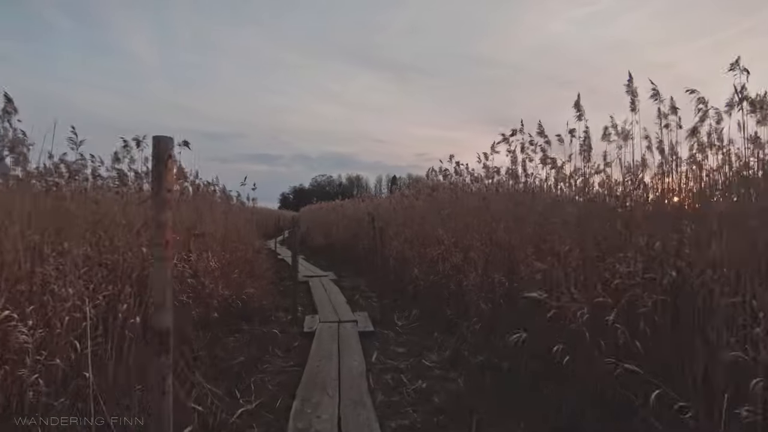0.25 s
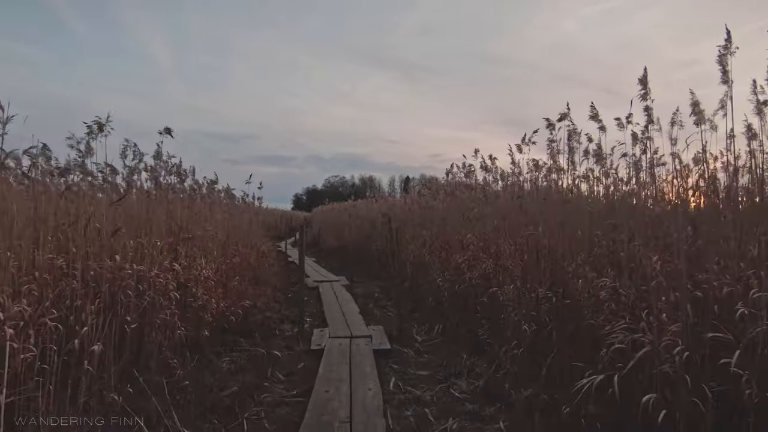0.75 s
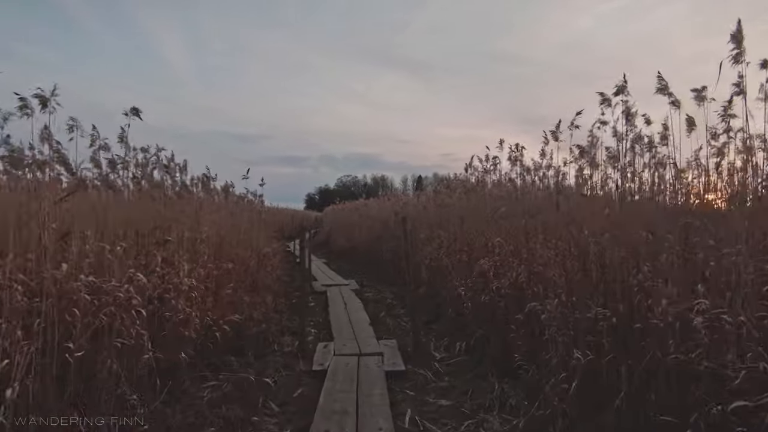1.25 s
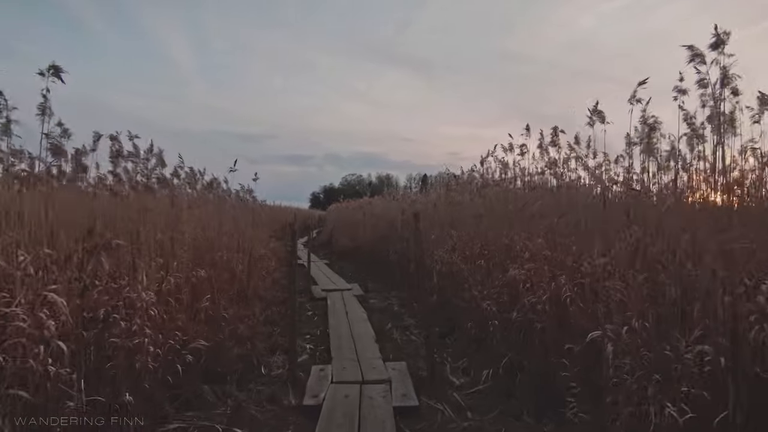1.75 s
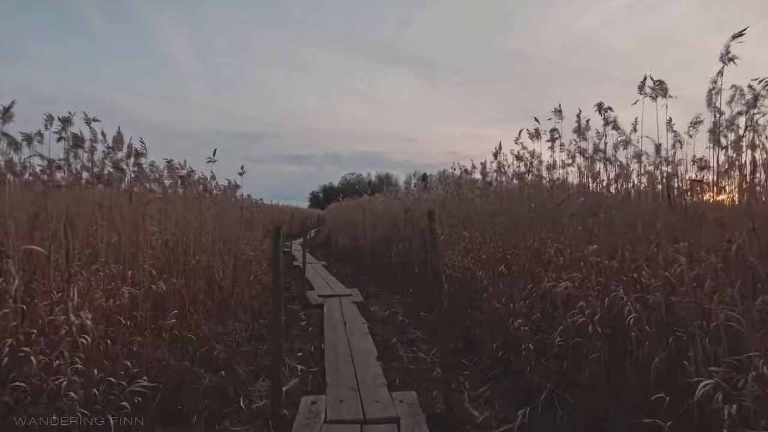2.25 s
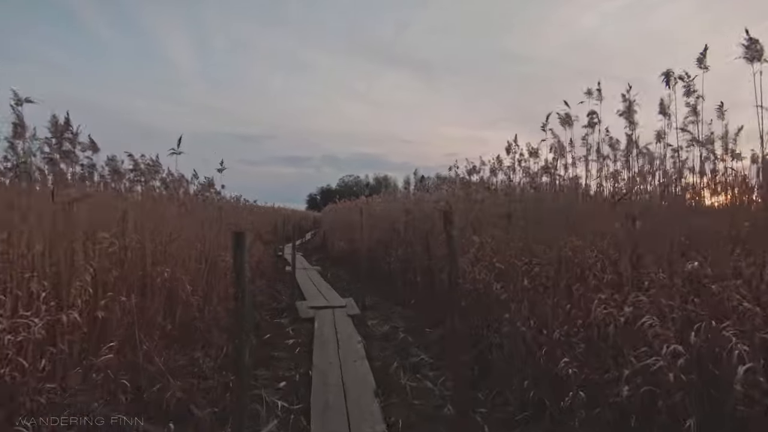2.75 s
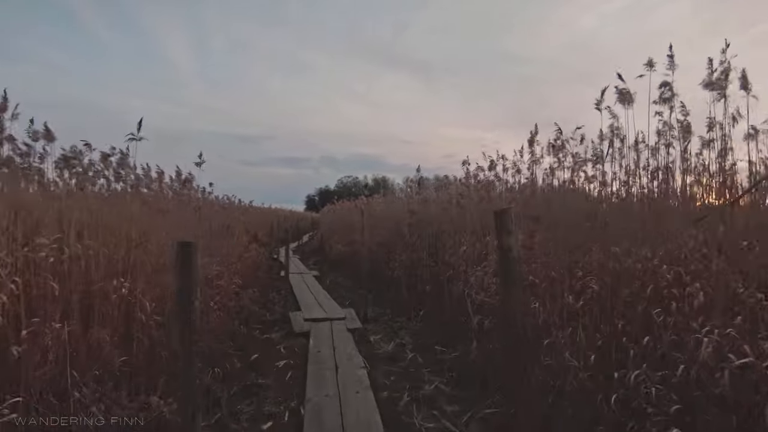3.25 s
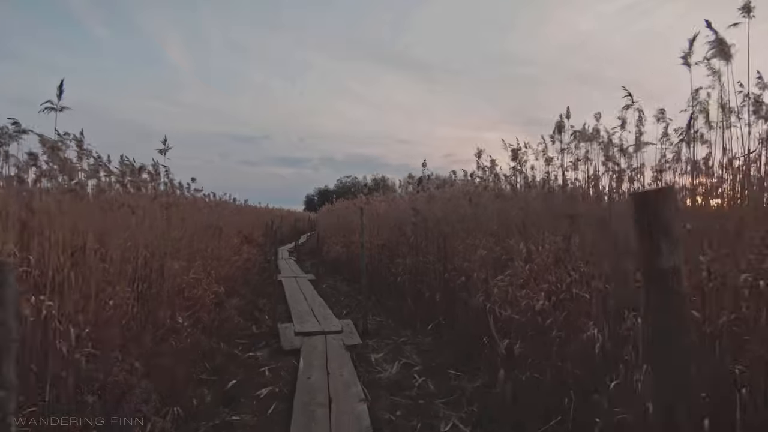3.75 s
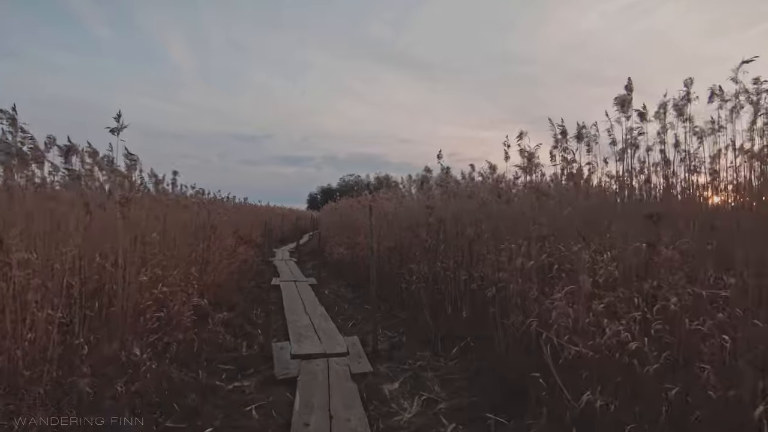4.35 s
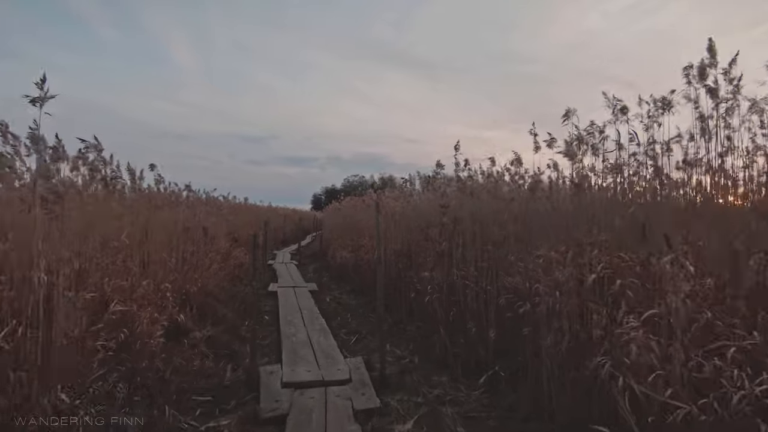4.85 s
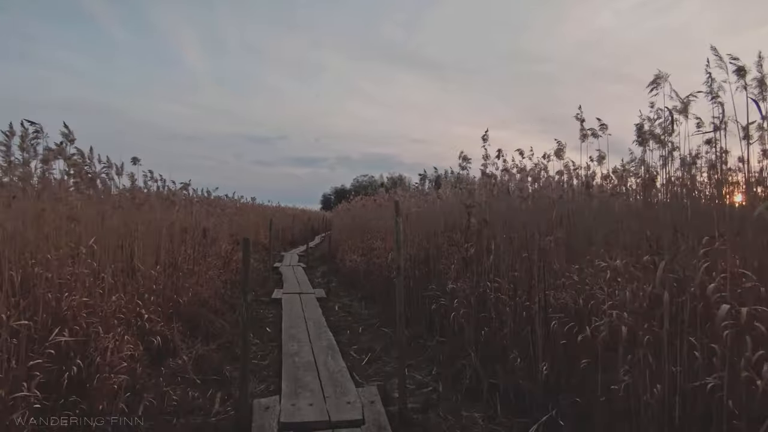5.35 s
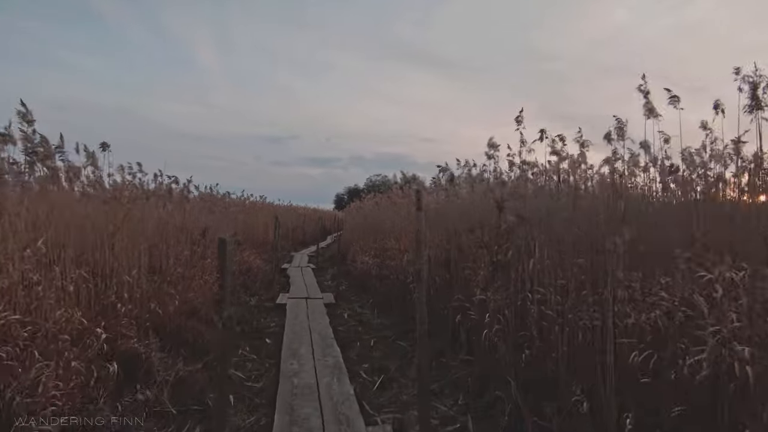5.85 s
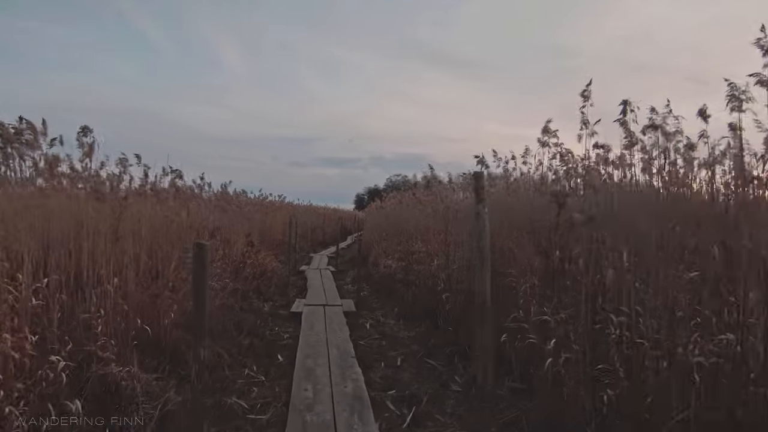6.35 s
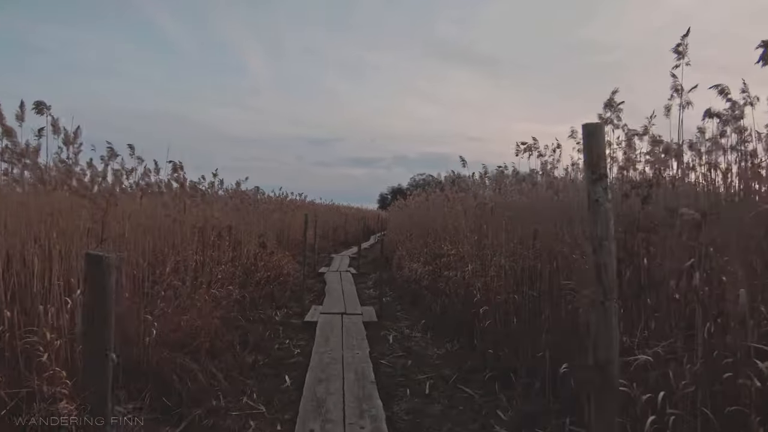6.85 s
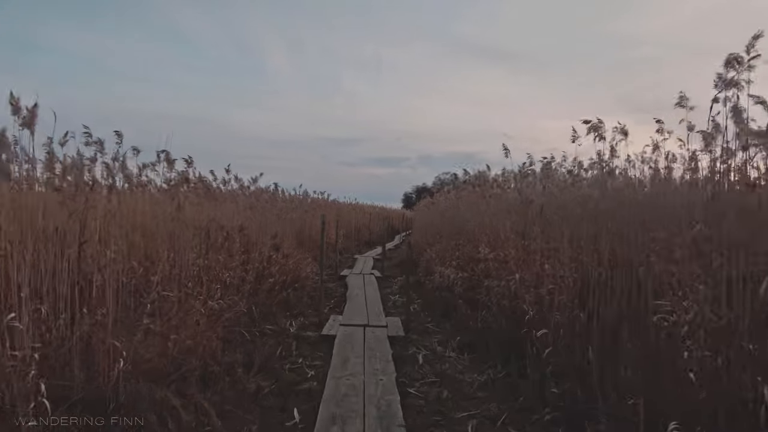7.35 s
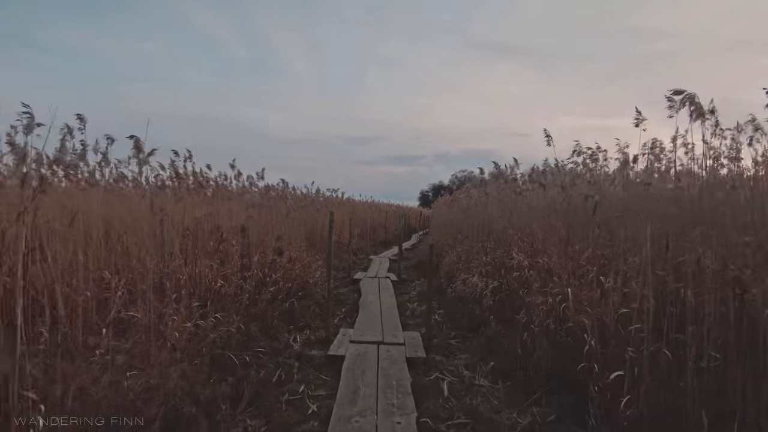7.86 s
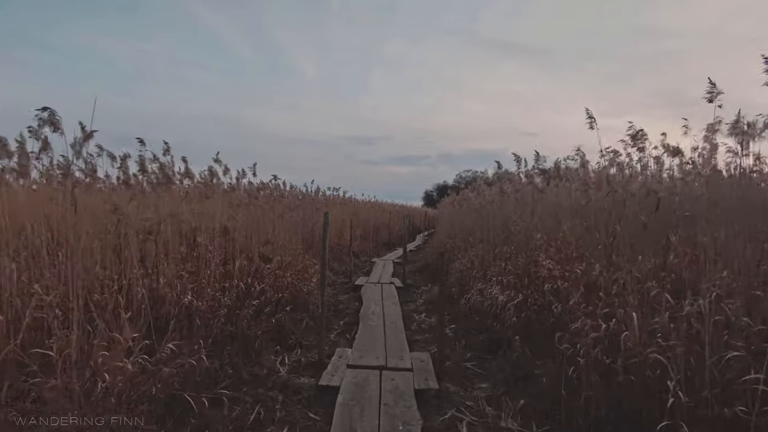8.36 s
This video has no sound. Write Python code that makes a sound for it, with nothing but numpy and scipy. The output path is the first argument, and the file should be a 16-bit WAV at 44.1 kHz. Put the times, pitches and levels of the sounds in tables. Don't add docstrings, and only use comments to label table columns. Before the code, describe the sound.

Close outdoor walking sounds from a small microphone carried by the walker: about two steps a second, hollow plank thuds with a quick chirpy attack, some doubled as the weight settles. Grit cracks and dry stems snap irregularly around them, soles brush and drag, and faint rubber squeaks mark mid stride. Low wind buffeting rises and falls beneath, strongest near the end, with a faint, smooth rush of reeds behind.

```python
import sys
import numpy as np
from scipy import signal
from scipy.fft import rfft, irfft, next_fast_len
from scipy.io import wavfile
from scipy.ndimage import uniform_filter1d

SR = 44100
rng = np.random.default_rng(int(sys.argv[2]) if len(sys.argv) > 2 else 0)


def invert_db(x):
    u = np.asarray(x, float) / 20
    return 10 ** u


def wav_out(sig):
    wavfile.write(sys.argv[1], SR, np.round(np.clip(np.atleast_2d(sig).T, -1, 1) * 32767).astype(np.int16))


N = 380141

# (time [s], buffeting level [dB])
WIND = [(0.0, -28.5), (0.5, -39), (1.0, -33.5), (1.5, -30), (1.85, -29), (2.3, -30.5), (2.75, -31.5),
        (3.3, -33), (3.75, -32.5), (4.2, -31), (4.75, -30), (5.3, -29), (5.75, -26), (6.3, -32), (7.0, -19),
        (7.7, -34), (8.3, -22.5), (8.62, -33.5)]
# (frequency [Hz], level [dB per Hz])
BUFFET_SPECTRUM = [(1.2, 8), (3, 18.5), (8, 4), (15, -1.5), (22, 3), (30, -32.5)]
RUMBLE_SPECTRUM = [(22, -6.5), (35, -6), (55, -15.5), (90, -27), (150, -29)]
RUSTLE_SPECTRUM = [(60, -1), (150, -12.5), (300, -5), (600, -15), (1100, -26), (2500, -37.5)]
RUSH_SPECTRUM = [(500, 4.5), (1200, -2.5), (2500, -4), (5000, -9), (8000, -8.5), (11000, -12.5),
                 (16000, -11.5)]
# (time [s], peak [dB], plank mode [Hz], hollow mode [Hz], hollow over plank [dB])
HEELS = [(0.6447, -37, 349, 178, -24), (0.659, -35.5, 260, 247, -8), (0.712, -37, 515, 240, -13),
         (1.213, -37, 414, 201, -6), (1.718, -48, 493, 256, 3), (2.294, -33.5, 298, 250, -7),
         (2.861, -36.5, 386, 216, -1.5), (3.395, -37, 354, 212, -10), (3.945, -62, 356, 192, 20.5),
         (3.985, -38, 284, 255, -22), (3.99, -26, 347, 262, -18), (4.56, -25, 325, 266, -13),
         (5.056, -36, 323, 188, -0.5), (5.594, -36.5, 367, 220, -11.5), (6.166, -38, 461, 217, -0.5),
         (6.71, -38, 348, 200, -1), (7.273, -45.5, 265, 236, -4), (7.82, -31.5, 349, 262, -11.5),
         (8.367, -31.5, 293, 180, -6.5)]
SETTLES = [(0.072, -31, 316, 202, -16), (1.221, -28, 284, 260, -28), (1.753, -32, 339, 182, -2.5),
           (3.432, -52, 290, 219, 20), (4.482, -39.5, 300, 198, -1), (4.571, -29, 285, 257, -2.5),
           (4.623, -40.5, 336, 237, -9), (5.064, -51.5, 254, 226, 18), (7.299, -47, 306, 183, 12.5),
           (7.834, -34, 310, 223, -1.5), (8.386, -41.5, 342, 218, 9.5)]
# (frequency [Hz], level over bending wave [dB], t60 [s])
PLANK_UPPER_MODES = [(487, -14.5, 0.044), (720, -12.5, 0.023), (970, -16.5, 0.011), (1500, -13, 0.014),
                     (1840, -6, 0.0042)]
# (start [s], length [s], level [dB], sole ring [Hz])
BRUSHES = [(0.105, 0.056, -62, 3360), (0.663, 0.047, -54.5, 1500), (1.239, 0.032, -61, 2500),
           (1.759, 0.058, -62.5, 3500), (2.322, 0.05, -51, 1300), (3.962, 0.029, -47.5, 2000),
           (4.501, 0.062, -58, 1640), (5.619, 0.071, -58, 2190), (6.191, 0.069, -53, 1460),
           (6.957, 0.052, -65, 2090), (7.205, 0.036, -62.5, 3000), (7.269, 0.1, -56, 1570),
           (7.383, 0.068, -56, 1870), (7.75, 0.067, -56.5, 2220), (7.816, 0.045, -59.5, 3240),
           (8.384, 0.065, -56, 2010)]
DRAGS = [(2.368, 0.046, -49.5, 1200), (2.529, 0.057, -62, 1460), (2.895, 0.051, -54.5, 2740),
         (3.429, 0.032, -57.5, 2430), (3.98, 0.105, -50.5, 1210), (4.025, 0.055, -55.5, 2420),
         (4.383, 0.074, -63.5, 2840), (5.232, 0.09, -63, 1710), (5.92, 0.03, -55.5, 800),
         (6.727, 0.053, -47.5, 1750), (7.442, 0.022, -51, 2400), (2.432, 0.061, -62, 1240),
         (7.918, 0.033, -59, 1730), (4.251, 0.04, -57.5, 1200), (5.86, 0.05, -65, 1400)]
# (time [s], squeak peak [dB], pitch [Hz], scuff level [dB])
PEELS = [(0.4244, -54, 3770, -57.5), (0.9644, -63.5, 3010, -64), (1.545, -62.5, 2720, -65),
         (2.061, -62, 2580, -62), (2.637, -64, 3750, -63.5), (3.171, -63.5, 3350, -68),
         (3.738, -53, 4080, -58), (4.272, -59.5, 3560, -64), (5.937, -57, 4100, -64),
         (6.482, -70, 2540, -66), (7.053, -59, 3150, -57), (8.151, -56.5, 3640, -60),
         (8.534, -61, 3500, -65)]
# (time [s], peak [dB], ring [Hz], treble over ring [dB])
STALKS = [(0.1471, -41, 1300, 13.5), (0.2016, -51.5, 1240, 19), (0.6595, -23.5, 1880, 6),
          (0.7128, -10, 2110, 7), (0.8054, -52, 1240, 16), (1.2774, -30.5, 1640, 3.5),
          (1.3075, -42, 2350, 9), (1.6553, -42.5, 1500, 5), (2.3351, -39, 1210, -6),
          (2.349, -39.5, 1390, 8.5), (2.377, -41.5, 1240, 9), (2.4274, -34.5, 1260, 6),
          (2.4545, -37.5, 1450, -7), (2.8644, -32.5, 1420, 7), (3.4187, -45, 1407, -11),
          (5.0897, -41.5, 1470, -1), (5.117, -28.5, 1640, 7), (5.8713, -53, 1370, 19),
          (6.1966, -38, 1220, -6), (7.258, -39, 1340, 2), (7.2952, -41.5, 1640, 18.5),
          (7.3477, -45.5, 1590, 18), (7.416, -51, 1200, 0), (7.451, -42, 1270, -8),
          (7.7569, -39.5, 1970, 13.5), (8.422, -63, 1410, -9.5), (8.515, -52, 3600, -8.5)]
# (time [s], peak [dB], ring [Hz], debris tail [dB])
GRIT = [(0.167, -35, 2140, -14), (1.51, -44.5, 1460, -7.5), (1.717, -32.5, 1450, -7.5),
        (1.7518, -37, 1700, -15), (1.8595, -46.5, 1470, -1), (2.9125, -41, 2880, -1.5),
        (3.0134, -50, 1200, 0), (3.45, -45, 1430, -9), (3.9823, -26.5, 1310, -5.5),
        (4.4854, -39, 1610, -19), (4.5615, -21.5, 1650, -13), (4.5948, -39.5, 1650, -5),
        (4.765, -44, 1710, -13), (6.7513, -20.5, 1770, -23), (7.317, -36.5, 1320, -1),
        (7.503, -27, 1400, -6.5), (7.979, -42.5, 1810, -6), (8.547, -43.5, 2070, -7)]

RUMBLE_DB, RUSTLE_DB, RUSH_DB = -60, -61, -67.5
RUMBLE_FOLLOWS_WIND = 0.4
RUSTLE_RISE_DB_PER_S = 0.35
PLANK_T60_S, CAVITY_T60_S = 0.081, 0.12
HEEL_WAVE_DB, SETTLE_WAVE_DB = -40.5, -48
WAVE_FOLLOWS_BLOW = 0.46
BRUSH_TREBLE_DB, DRAG_TREBLE_DB, PEEL_TREBLE_DB = -1.5, -19, -24
BRUSH_RING_DB, DRAG_RING_DB, PEEL_RING_DB = -15, -9.5, -14
RING_DB_PER_OCTAVE = 9
PEEL_LEAD_S, PEEL_S = 0.02, 0.045
PEEL_RING_SHARE = 0.65
STALK_TAIL_DB, STALK_T60_S = -9, 0.083
BIG_SNAP_T60_LOSS_S = 0.0016
GRIT_TREBLE_DB, GRIT_T60_S = -38, 0.071
SQUEAK_S = 0.009
GROUND_ECHO_S, GROUND_ECHO_DB = 0.003425, -18.5
MICROPHONE_TOP_HZ = 15900


def rms_one(x):
    return x / np.sqrt(np.mean(x ** 2) + 1e-20)


def add(out, s, sound):
    i = max(round(s * SR), 0)
    out[i:i + len(sound)] += sound[:N - i]


def in_time(rows):
    s, *columns = np.transpose(rows)
    return [np.interp(np.arange(N) / SR, s, c) for c in columns]


def drift(rate):
    r = np.exp(-80 * np.pi * rate / SR)
    noise = rng.standard_normal(N // 40 + 2002)
    slow = signal.lfilter([1], [1, -2 * r, r * r], noise)[2000:]
    return np.interp(np.arange(N) / 40, np.arange(len(slow)), rms_one(slow))


def coloured(spectrum):
    size = next_fast_len(N)
    hz = np.maximum(np.fft.rfftfreq(size, 1 / SR), 0.1)
    points_hz, points_db = np.transpose(spectrum)
    gain = invert_db(np.interp(np.log(hz), np.log(points_hz), points_db))
    gain *= np.minimum(hz / points_hz[0], 1) ** 3 * np.minimum(points_hz[-1] / hz, 1) ** 3
    return rms_one(irfft(rfft(rng.standard_normal(size)) * gain, size)[:N])


def evened(x, seconds):
    return x / np.sqrt(uniform_filter1d(x ** 2, round(seconds * SR)) + 0.45)


def ring(force, hz, t60):
    r, w = invert_db(-60 / (max(t60, 0.002) * SR)), 2 * np.pi * hz / SR
    return signal.lfilter([0, np.sin(w)], [1, -2 * r * np.cos(w), r * r], force)


def sole(grit, ring_hz, ring_db, ring_t60):
    wide = signal.butter(1, [550, ring_hz * 1.6], "band", fs=SR, output="sos")
    return signal.sosfilt(wide, grit) + invert_db(ring_db) * ring(grit, ring_hz, ring_t60)


def treble(grit):
    steep = signal.butter(2, 4500, "high", fs=SR, output="sos")
    gentle = signal.butter(1, 9000, fs=SR, output="sos")
    return signal.sosfilt(np.vstack([steep, gentle]), grit)


def air():
    wind_db, = in_time(WIND)
    buffet = invert_db(wind_db + 1.5 * drift(3.0)) * evened(coloured(BUFFET_SPECTRUM), 0.3)
    rumble_db = RUMBLE_DB + RUMBLE_FOLLOWS_WIND * (wind_db - wind_db.mean()) + 0.9 * drift(4.5)
    rumble = invert_db(rumble_db + 5) * evened(coloured(RUMBLE_SPECTRUM), 0.14)
    from_middle_s = (np.arange(N) - N / 2) / SR
    rustle_db = RUSTLE_DB + RUSTLE_RISE_DB_PER_S * from_middle_s + 3.7 * drift(10)
    rustle = invert_db(rustle_db) * coloured(RUSTLE_SPECTRUM)
    rush_db = RUSH_DB + 2.0 + 0.07 * drift(8.7) + 0.38 * drift(27)
    rush = invert_db(rush_db) * coloured(RUSH_SPECTRUM)
    return buffet + rumble + rustle + rush


def knocks():
    out, t = np.zeros(N), np.arange(SR // 4) / SR
    blows = [(*row, HEEL_WAVE_DB) for row in HEELS]
    blows += [(*row, SETTLE_WAVE_DB) for row in SETTLES]
    noises = rng.standard_normal((len(blows), len(t)))
    chance = rng.standard_normal((len(blows), 2 + len(PLANK_UPPER_MODES)))
    build = 1 - np.exp(-t / 0.0048)
    for (s, peak_db, plank_hz, hollow_hz, hollow_db, wave_db), noise, luck in zip(blows, noises, chance):
        wave_db = wave_db + WAVE_FOLLOWS_BLOW * (peak_db + 37)
        phase = 230 * (1 + 0.05 * luck[0]) * (np.sqrt(t + 0.00011) - np.sqrt(0.00011))
        wave = np.sin(phase) * (0.19 + t / 0.0019) * np.exp(-t / 0.0025)
        wave = signal.lfilter([0.35], [1, -0.65], wave)
        roll = signal.lfilter([0.1], [1, -0.9], noise) * invert_db(-27 - 60 * t / 0.09)
        force = (t == 0) + roll
        second_hz = plank_hz * (1.237 + 0.033 * luck[1])
        boom = ring(force, plank_hz, PLANK_T60_S) + invert_db(-3) * ring(force, second_hz, 0.086)
        boom = boom + invert_db(hollow_db) * ring(force, hollow_hz, CAVITY_T60_S)
        upper = np.zeros(len(t))
        for (hz, db, t60), shift in zip(PLANK_UPPER_MODES, luck[2:]):
            onset = 1 - np.exp(-t * hz / 1.3)
            upper += invert_db(db) * onset * ring(force, hz * (1 + 0.084 * shift), t60)
        add(out, s, invert_db(peak_db - 1.5) * build * boom + invert_db(wave_db + 11.0) * (wave + upper))
    return signal.sosfilt(signal.butter(2, 140, "high", fs=SR, output="sos"), out)


def scuffs():
    out, size = np.zeros(N), SR // 5
    rows = [(*row, BRUSH_TREBLE_DB, BRUSH_RING_DB) for row in BRUSHES]
    rows += [(*row, DRAG_TREBLE_DB, DRAG_RING_DB) for row in DRAGS]
    rows += [(s - PEEL_LEAD_S, PEEL_S, db, hz * PEEL_RING_SHARE, PEEL_TREBLE_DB, PEEL_RING_DB)
             for s, _, hz, db in PEELS]
    draws = rng.standard_normal((len(rows), 3, size))
    for (s, length, level_db, ring_hz, treble_db, ring_db), (noise, fine, lumps) in zip(rows, draws):
        ring_db = ring_db + RING_DB_PER_OCTAVE * np.log2(ring_hz / 2000)
        stroke = np.sin(np.pi * np.clip(np.arange(size) / SR / length, 0, 1)) ** 0.64
        grains = stroke * invert_db(4.5 * rms_one(uniform_filter1d(lumps, size=70)))
        friction = noise * grains
        body = sole(friction, ring_hz, ring_db - 20, ring_t60=0.009)
        rings = ring(friction, 1216, 0.012) + 0.6 * ring(friction, 460, 0.015)
        body = body + invert_db(-32) * rings
        body = signal.lfilter(*signal.butter(1, 4500, fs=SR), body)
        drag = body + invert_db(treble_db - 7.0) * treble(fine * grains)
        add(out, s, invert_db(level_db + 5.0) * drag)
    return out


def cracks():
    out, t = np.zeros(N), np.arange(SR // 6) / SR
    rows = []
    for s, db, hz, treble_db in STALKS:
        t60 = STALK_T60_S - BIG_SNAP_T60_LOSS_S * (db + 35)
        rows.append((s, db, hz, t60, treble_db, STALK_TAIL_DB))
    rows += [(s, db, hz, GRIT_T60_S, GRIT_TREBLE_DB, tail_db) for s, db, hz, tail_db in GRIT]
    draws = rng.standard_normal((len(rows), 2, len(t)))
    snap = (1 - np.exp(-t / 0.0004)) * invert_db(-60 * t / 0.0062)
    for (s, peak_db, ring_hz, t60, treble_db, tail_db), (noise, fine) in zip(rows, draws):
        tail = invert_db(tail_db - 60 * t / max(t60, 0.01))
        body = sole(noise * (snap + tail), ring_hz, ring_db=-15.0, ring_t60=0.0021)
        edge = treble(fine * (snap + 0.2 * tail * invert_db(-60 * t / 0.0092)))
        add(out, s, invert_db(peak_db - 2.0) * (body + invert_db(treble_db - 5.0) * edge))
    return out


def squeaks():
    out, t = np.zeros(N), np.arange(SR // 20) / SR
    wavers = rng.standard_normal((len(PEELS), len(t)))
    along = np.clip(t / SQUEAK_S, 0, 1)
    for (s, peak_db, pitch_hz, _), waver in zip(PEELS, wavers):
        bend = 1 - 0.2 * (1 - along) ** 4 - 0.1 * along ** 4
        bend = bend + 0.02 * rms_one(uniform_filter1d(waver, size=60))
        phase = 2 * np.pi * pitch_hz * np.cumsum(bend) / SR
        whistle = np.sin(phase) + invert_db(-15) * np.sin(2 * phase)
        add(out, s, invert_db(peak_db + 4) * np.sin(np.pi * along) * whistle)
    return out


def scene():
    steps = knocks() + scuffs() + cracks() + squeaks()
    lag = round(GROUND_ECHO_S * SR)
    bounce = signal.lfilter([0.4], [1, -0.6], np.pad(steps, (lag, 0))[:N])
    return (steps + invert_db(GROUND_ECHO_DB) * bounce + air())[None]


def band_limit(x):
    return signal.sosfilt(signal.butter(12, 16510, fs=SR, output="sos"), x)


def record(dry):
    top_cut = signal.cheby2(12, 40, MICROPHONE_TOP_HZ, fs=SR, output="sos")
    return band_limit(signal.sosfilt(top_cut, dry))


dry = scene()
out = record(dry)
wav_out(out)
```